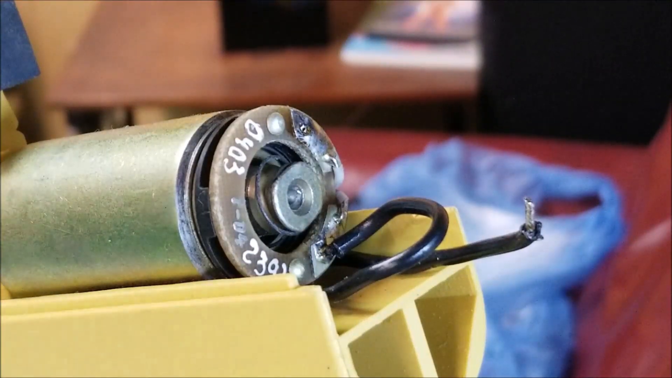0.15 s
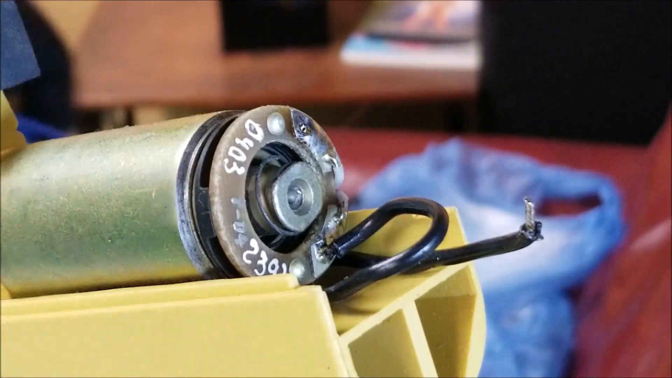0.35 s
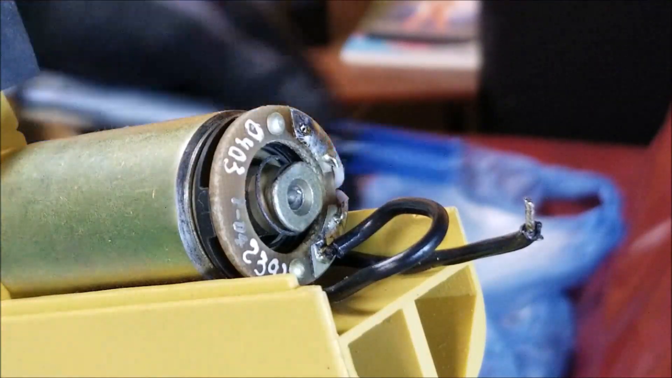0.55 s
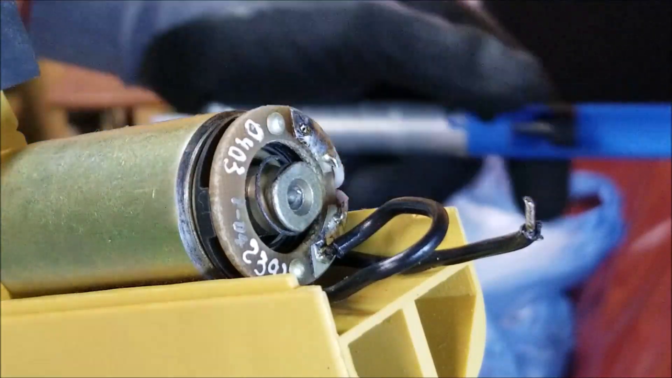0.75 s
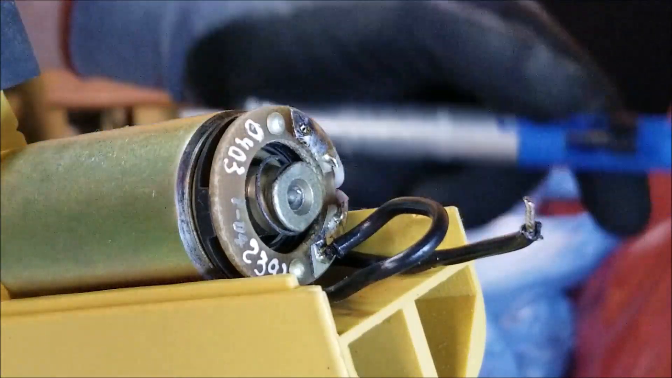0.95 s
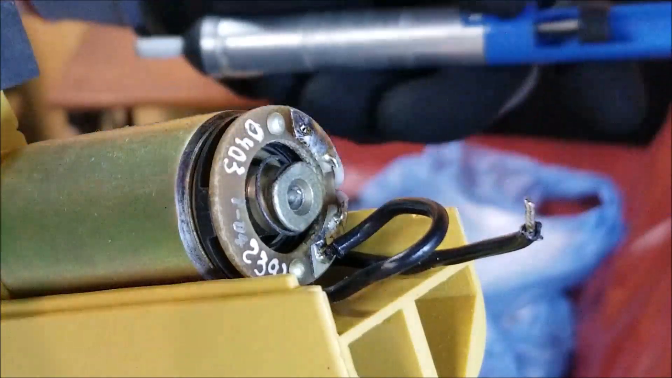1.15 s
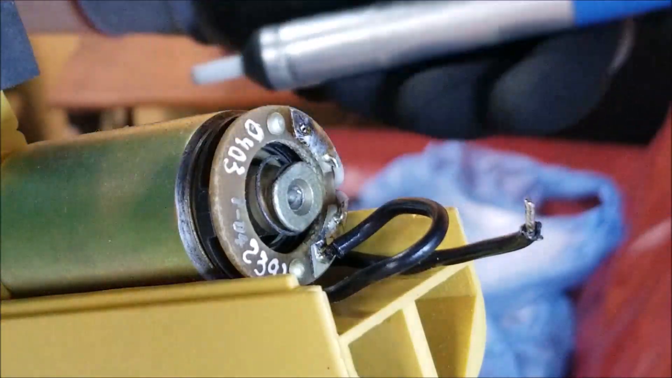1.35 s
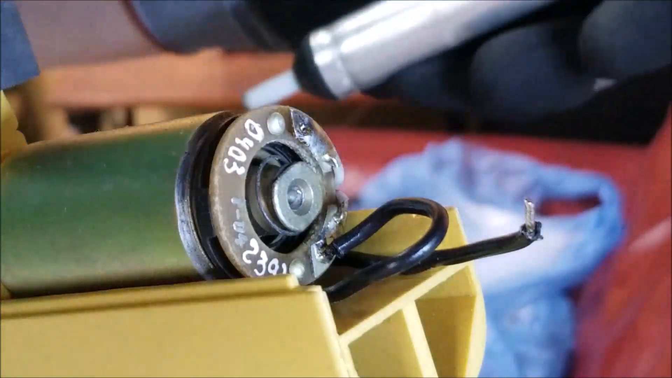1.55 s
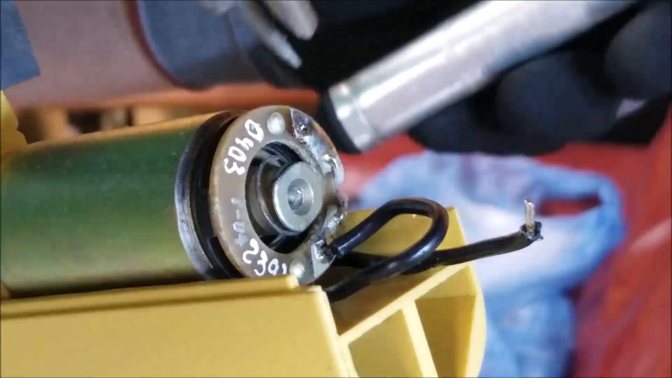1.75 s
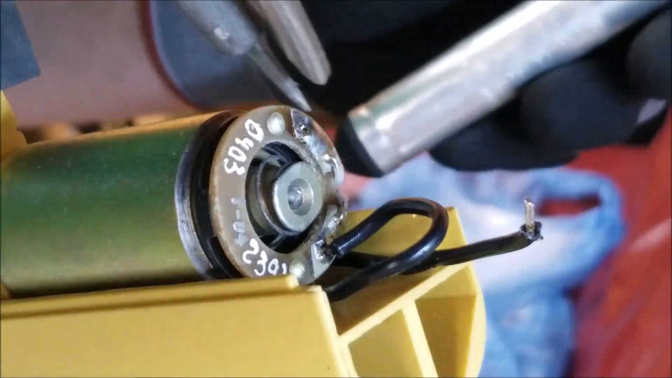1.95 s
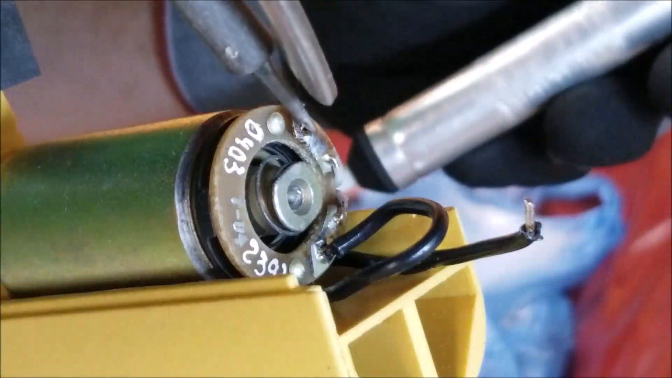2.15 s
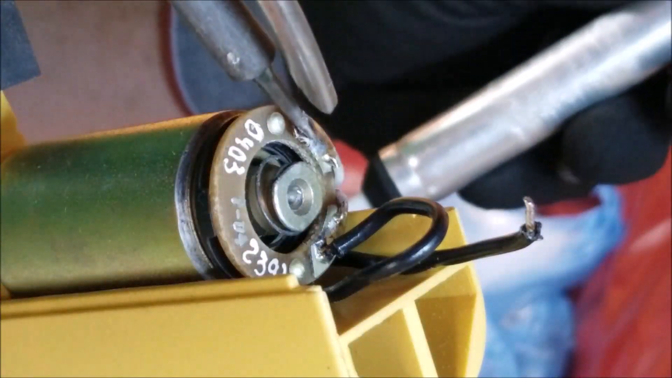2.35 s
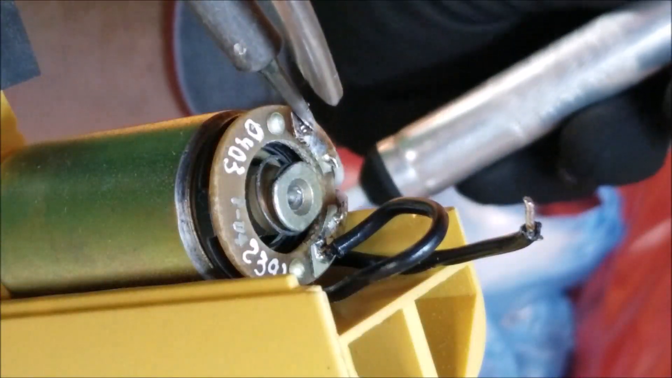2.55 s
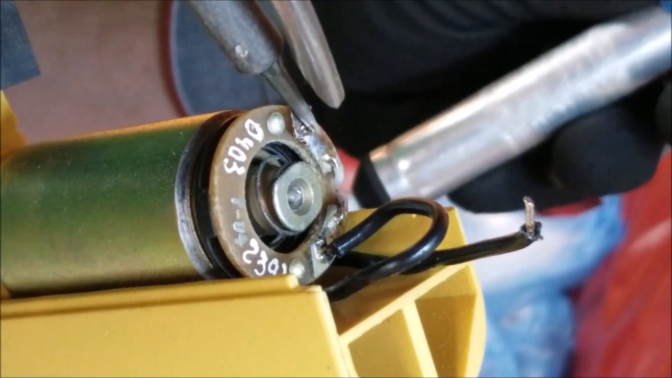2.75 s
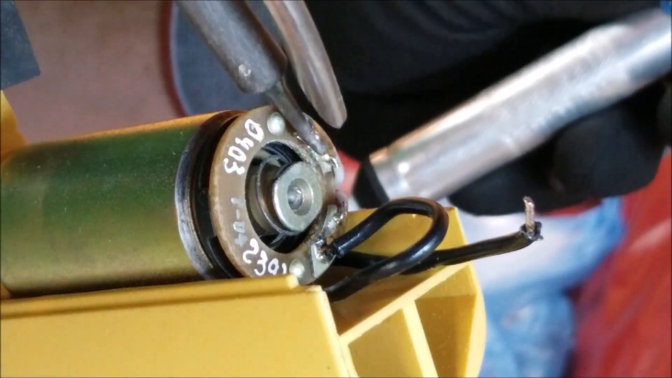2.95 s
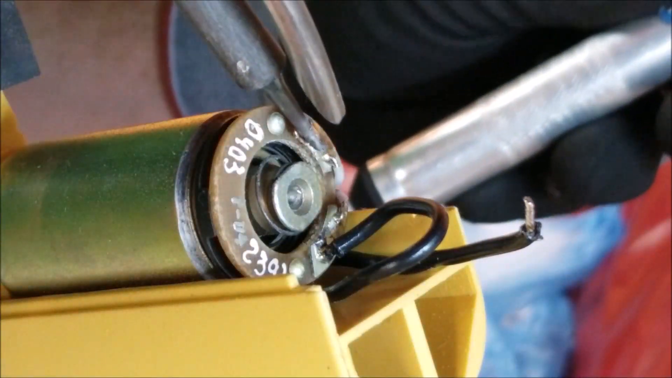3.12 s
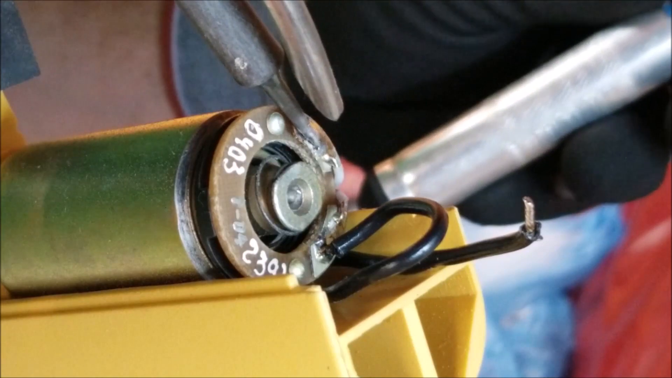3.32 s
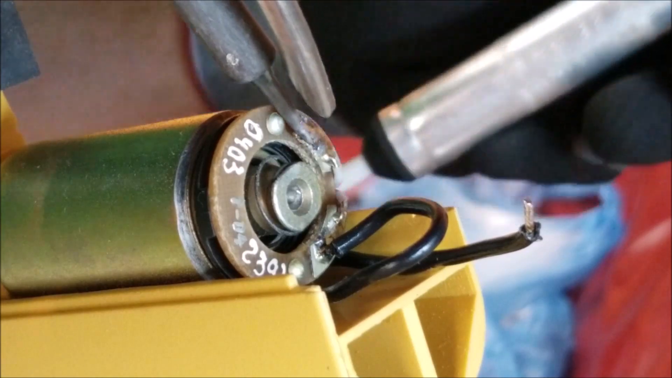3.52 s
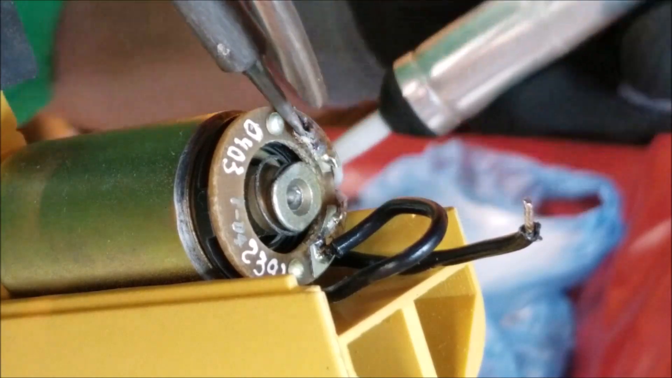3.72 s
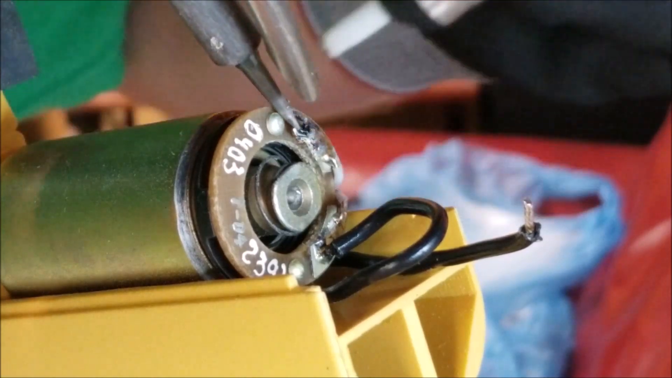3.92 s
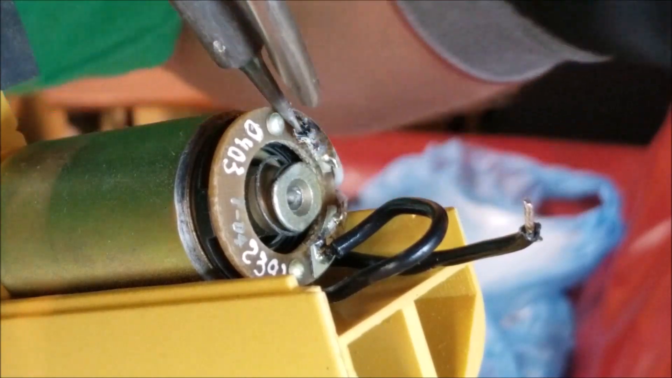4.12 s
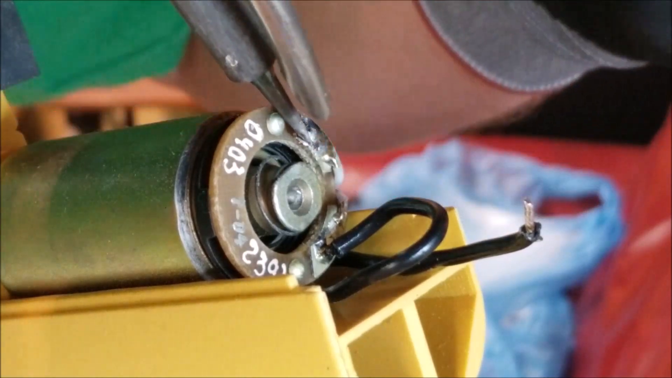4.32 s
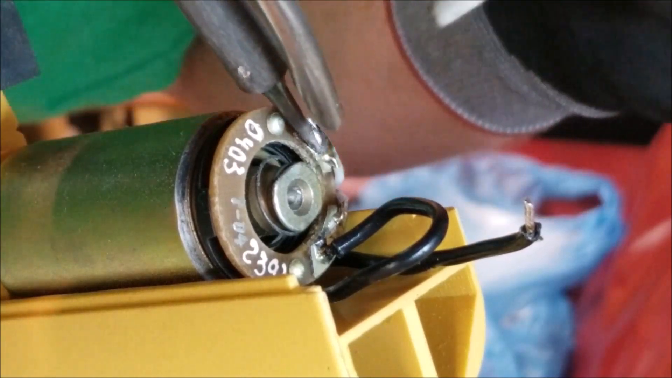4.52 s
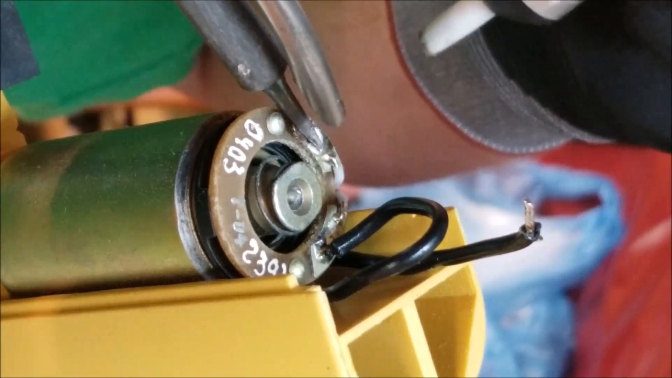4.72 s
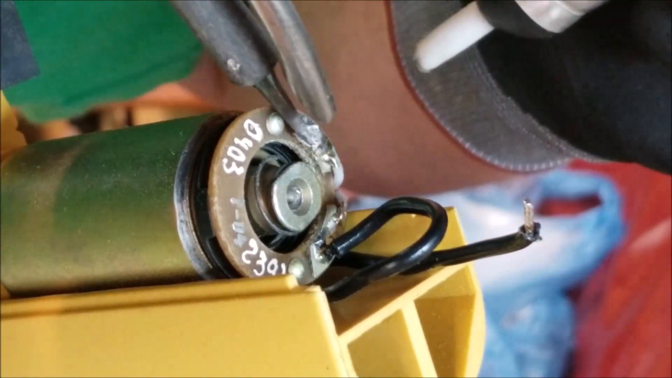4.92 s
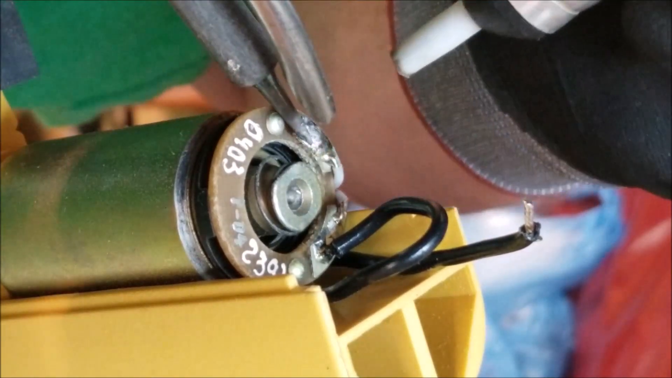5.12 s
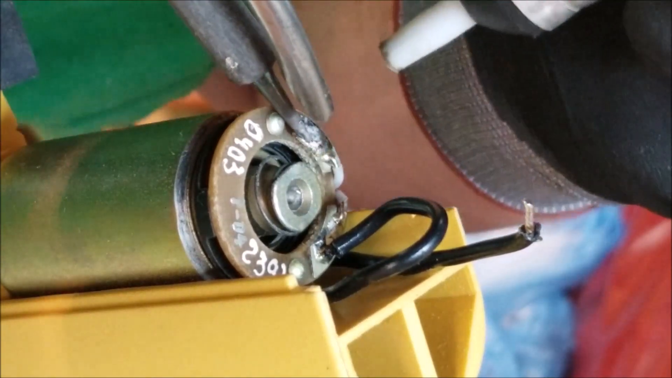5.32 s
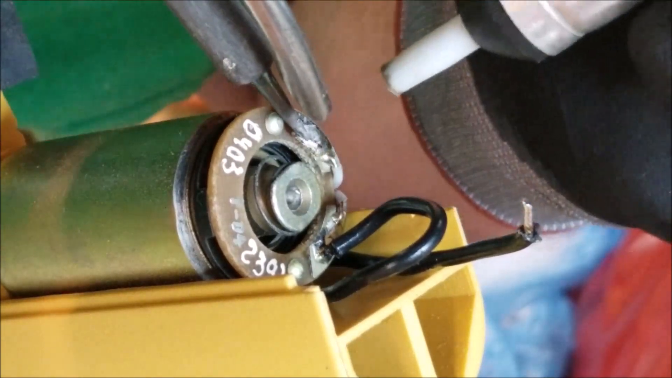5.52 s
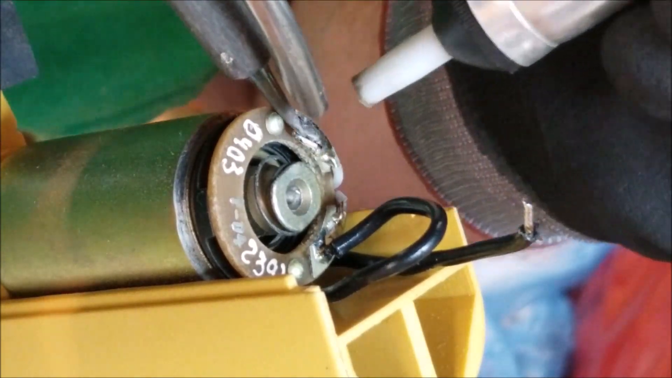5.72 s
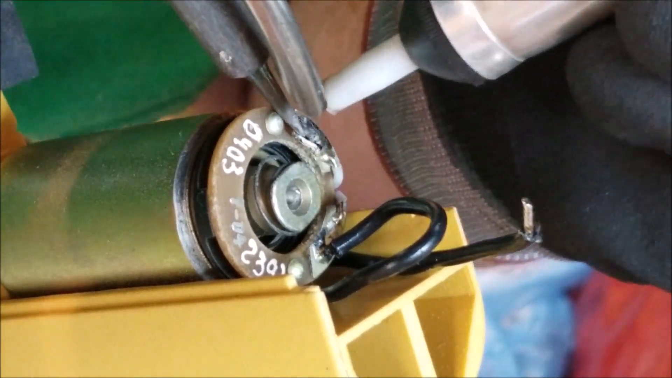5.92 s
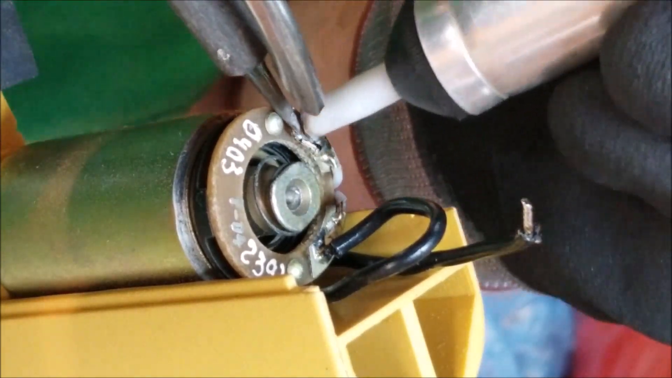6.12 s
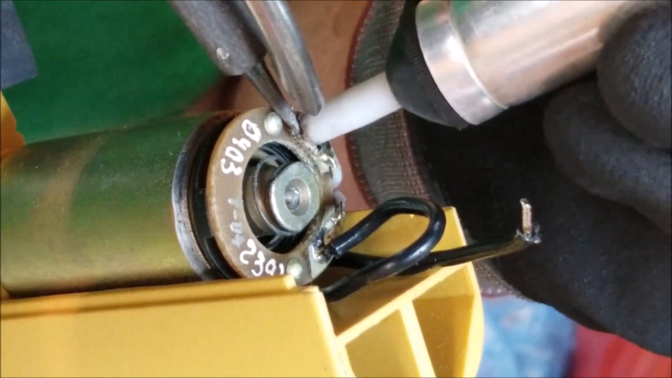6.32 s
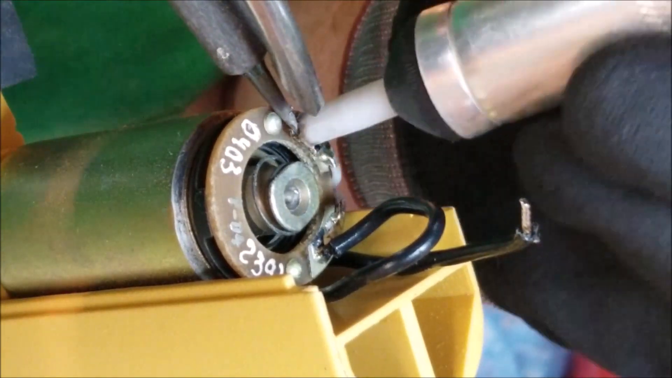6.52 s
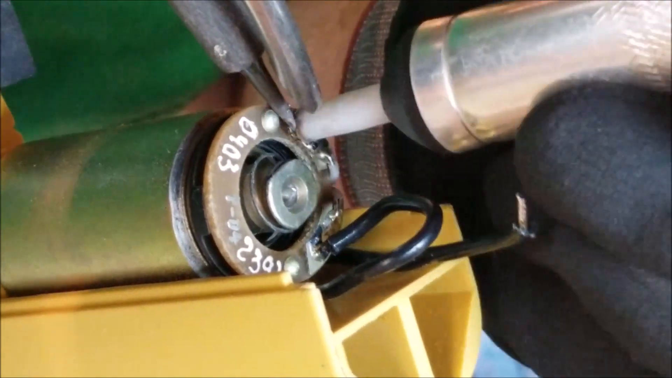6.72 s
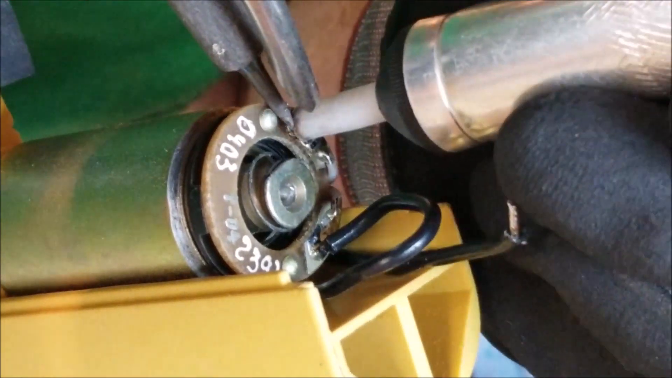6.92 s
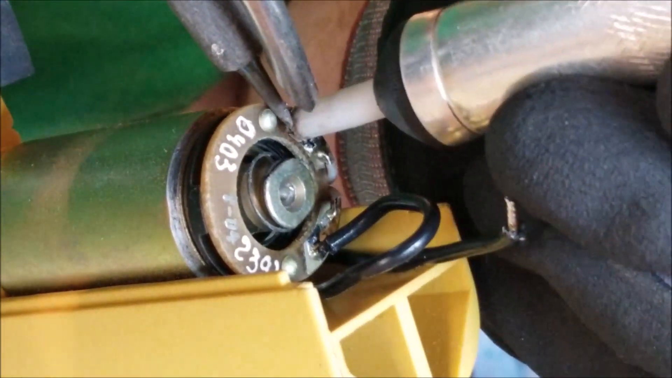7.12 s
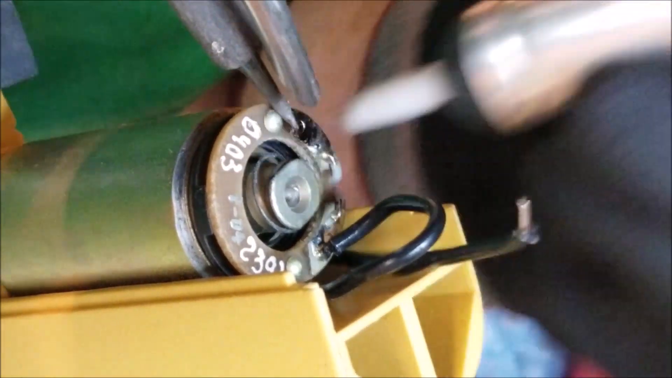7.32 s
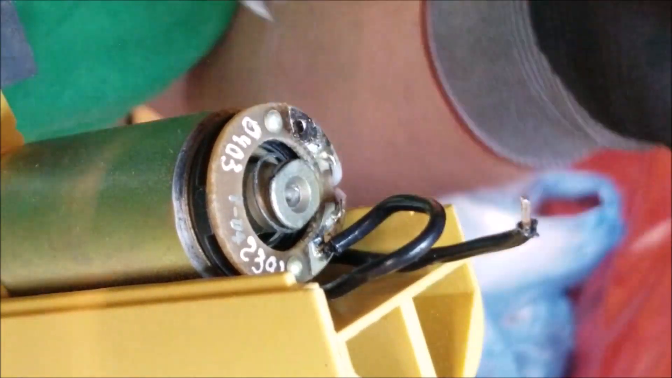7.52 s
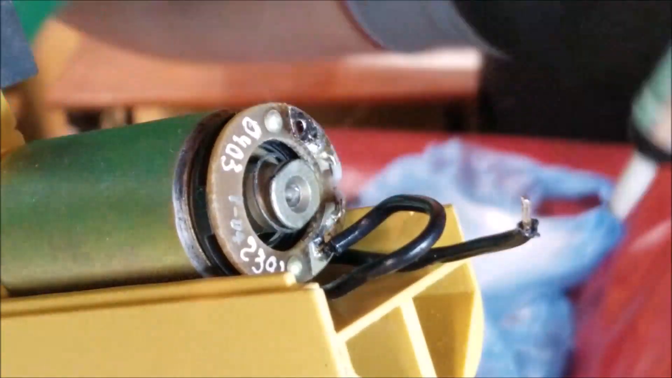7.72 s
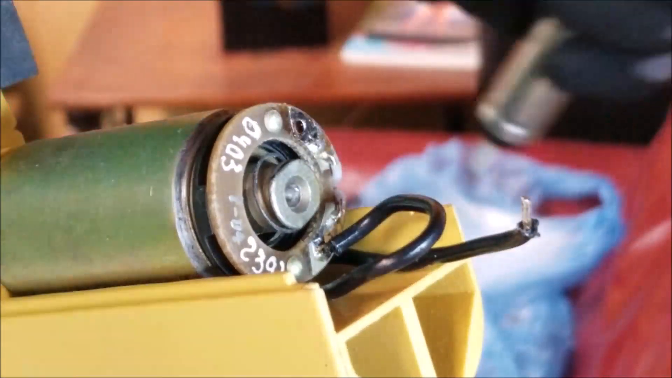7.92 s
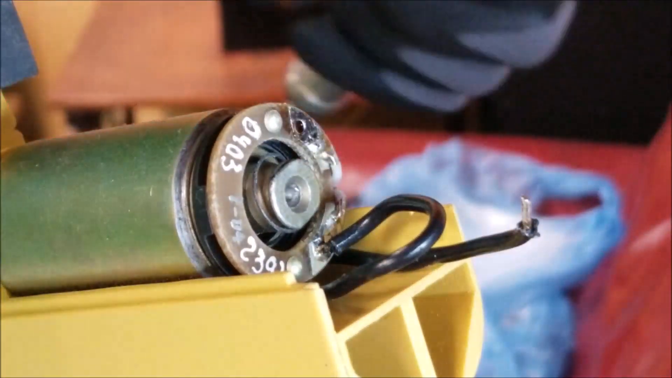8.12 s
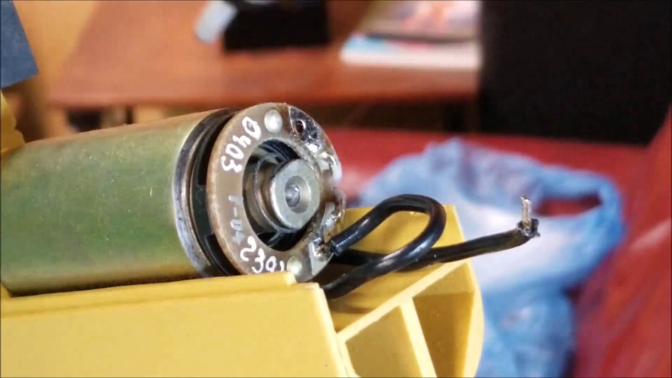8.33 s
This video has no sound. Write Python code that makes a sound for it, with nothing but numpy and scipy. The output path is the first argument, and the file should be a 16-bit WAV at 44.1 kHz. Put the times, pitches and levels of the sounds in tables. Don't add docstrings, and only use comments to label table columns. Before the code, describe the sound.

Steady mains hum and airy fan hiss in a small workshop, then one sharp rattling clack from a spring-loaded solder sucker with a brief air puff.

```python
import sys
import numpy as np
from scipy import signal
from scipy.fft import rfft, irfft
from scipy.io import wavfile
from scipy.ndimage import uniform_filter1d

SR = 44100
rng = np.random.default_rng(int(sys.argv[2]) if len(sys.argv) > 2 else 0)


def unload_audio(sound):
    columns = np.transpose(np.atleast_2d(sound))
    steps = np.round(np.clip(columns, -1, 1) * 32767)
    wavfile.write(sys.argv[1], SR, steps.astype(np.int16))


def boost(x):
    u = np.asarray(x, float) / 20
    return 10 ** u


N = 368764


def read(points, hz, column=1):
    table = np.transpose(points)
    return np.interp(np.log(hz + 1), np.log(table[0] + 1), table[column])


def read_pair(points, hz):
    return np.array([read(points, hz, column=c) for c in (1, 2)])


def curve(points, t):
    s, *columns = np.transpose(points)
    return np.array([np.interp(t, s, c) for c in columns])


def ramp(t, start, end):
    return np.clip((t - start) / (end - start), 0, 1)


def bump(x, centre, spread):
    return np.exp(-.5 * ((x - centre) / spread) ** 2)


def evened(x):
    return x / np.sqrt(np.mean(x ** 2) + 1e-20)


def add(mix, s, sound):
    part = mix[..., round(s * SR):][..., :sound.shape[-1]]
    part += sound[..., :part.shape[-1]]


def drift(rate_hz):
    coarse = evened(uniform_filter1d(rng.standard_normal(int(4 * rate_hz * N / SR) + 8), size=4))
    return np.interp(np.linspace(0, len(coarse) - 1, N), np.arange(len(coarse)), coarse)


def tone(hz, left_db, right_db, lead, waver_db):
    turn = 2 * np.pi * (hz * np.arange(N) / SR + rng.random())
    pair = np.array([boost(left_db) * np.sin(turn + lead), boost(right_db) * np.sin(turn)])
    return np.sqrt(2) * pair * boost(waver_db * drift(rate_hz=1.5))


def hands(t):
    # t/s, nearness/0-1
    path = [
        (0, 0),
        (.4, 0),
        (.75, 0.17),
        (1.05, 0.46),
        (1.4, 0.52),
        (1.7, 0.86),
        (2.1, 1),
        (7.5, 1),
        (7.95, 0.4),
        (8.36, 0.32),
    ]
    return np.clip(curve(path, t)[0], 0, 1)


def hum():
    # multiple of the mains, left level/dB, right level/dB, left lead/rad
    buzz = [(2, -56, -57, -0.2), (3, -59, -60, -0.1), (4, -68, -66, -0.5), (5, -69, -69, -0.3),
            (6, -83, -74, -0.9), (7, -71, -82, 1.9), (8, -74, -70, 0.4), (9, -63, -74, -2.7),
            (10, -61, -64, -0.3), (11, -71, -73, 0.0), (12, -74, -66, 0.8), (13, -78, -75, 0.4),
            (14, -67, -72, -2.3), (15, -71, -75, -1.3), (16, -82, -83, 0.3), (17, -76, -83, -0.4),
            (18, -72, -84, 0.7), (19, -70, -80, -2.4), (20, -72, -79, -1.2), (21, -79, -75, -1.2),
            (22, -68, -103, -2.1), (23, -78, -74, -2.0), (24, -69, -73, -0.9), (25, -72, -83, 2.8),
            (26, -78, -86, 2.9), (27, -72, -74, -1.8), (28, -70, -81, -2.2), (29, -83, -76, -2.9),
            (30, -72, -76, -0.8), (31, -81, -84, -2.9)]
    # multiple, left level/dB, right level/dB
    upper = [(32, -75, -81), (33, -81, -79), (34, -77, -83), (35, -78, -84), (37, -78, -87), (38, -76, -84),
             (39, -74, -84), (41, -80, -90), (42, -82, -90), (43, -76, -83), (44, -73, -85), (45, -82, -90),
             (46, -81, -90), (47, -82, -85), (48, -80, -91), (49, -85, -76), (50, -86, -88), (51, -87, -83),
             (53, -87, -90), (54, -84, -87), (55, -88, -90), (56, -86, -89)]
    opposed = (33, 34, 37, 38, 39, 42, 43, 48, 49)
    # f/Hz, left level/dB, right level/dB, left lead/rad
    fan = [(58.94, -53, -56, -0.1), (74.5, -74, -75, 0.2), (91.74, -73, -77, -0.1), (117.84, -73, -76, 0.2),
           (131.3, -59, -61, -0.1), (150.7, -73, -74, 0.0), (471.52, -60, -69, 0.1)]
    mains_hz = 60.002
    trigger_s, trigger_rise_s = 0.33, .2
    gun_off_db, gun_away_db = -1, -3
    surge_db, surge_period_s, surge_top_s = 1, 2.73, 3.52
    t = np.arange(N) / SR
    away = 1 - hands(t)
    off = 1 - ramp(t, trigger_s, trigger_s + trigger_rise_s)
    lines = {}
    for k, left_db, right_db, lead in buzz:
        lines[k] = tone(k * mains_hz, left_db, right_db, lead, waver_db=.7)
    for k, left_db, right_db in upper:
        lines[k] = tone(k * mains_hz, left_db, right_db, np.pi * (k in opposed), waver_db=1.0)
    lines[3] *= boost(5 * off)
    lines[12] *= boost(1.5 + 4.5 * away - 0.23 * t)
    gun = sum(line for k, line in lines.items() if k > 4)
    gun = gun * boost(gun_off_db * off + gun_away_db * away)
    shaft, *others = (tone(*row, waver_db=1.04) for row in fan)
    surge = surge_db * np.cos(2 * np.pi * (t - surge_top_s) / surge_period_s)
    return lines[2] + lines[3] + lines[4] + gun + shaft * boost(surge) + sum(others)


def cupped(hz, echoes, hollows, nearness, stretch):
    echo = sum(share * np.exp(-2j * np.pi * hz / stretch * ms / 1000) for ms, share in echoes)
    hollow_db = sum(db * bump(hz / stretch, f, spread) for f, spread, db in hollows)
    travel = 1.1 * nearness * (1 - nearness)
    return (1 + nearness * echo) * boost((.5 + .5 * nearness + travel) * hollow_db)


def hiss():
    # f/Hz, left level/dB per Hz, right level/dB per Hz
    hiss_colour = [(3000, -100.5, -95), (3480, -101.5, -99), (4730, -98, -99), (6040, -97.5, -99),
                   (5830, -102, -102.5), (7100, -101, -102), (7530, -104, -106), (8000, -105, -107),
                   (10040, -101, -104), (10400, -96, -100), (12600, -95.5, -99), (13000, -99, -99),
                   (14000, -102, -103), (15900, -105, -107)]
    # delay/ms, share
    left_echoes = [(1.96, -.3), (.53, .14), (1.27, .12), (2.9, .1)]
    # delay/ms, share
    right_echoes = [(1.105, .25), (1.6, .18), (.485, .12), (3.2, .12)]
    # f/Hz, width/Hz, level/dB
    left_hollows = [(4690, 150, 2), (6370, 180, 4), (7550, 120, -5), (8400, 200, -4), (9100, 100, -3),
                    (10030, 180, 3), (11970, 150, 3), (13390, 150, 2), (14470, 150, 3)]
    # f/Hz, width/Hz, level/dB
    right_hollows = [(6290, 180, 4), (7500, 150, -5), (8400, 130, -5), (9950, 130, 2), (12400, 180, 4),
                     (13500, 120, -3), (14430, 200, 3)]
    sway = [(0, 1.02), (.2, 1.0), (.4, .97), (.6, 1.04), (1, 1.0)]
    open_stretch, settled_at = 0.89, 0.69
    lag_near_ms, lag_away_ms = .103, .43
    pan_near_db, pan_away_db = -2, 15
    hz, t, (near, a, b) = signal.stft(rng.standard_normal((3, N)), SR, nperseg=1024, noverlap=768)
    hz = hz[:, None]
    nearness = hands(t)
    away = 1 - nearness

    tremor = .006 * drift(rate_hz=.8)[np.minimum(t * SR, N - 1).astype(int)]
    left_stretch = curve(sway, nearness)[0] + tremor
    right_stretch = open_stretch + (1 - open_stretch) * ramp(nearness, .1, settled_at) + tremor
    lag_ms = lag_near_ms + (lag_away_ms - lag_near_ms) * away ** 2
    direct = np.interp(hz, [3000, 5800, 9000, 14500, 15500], [.4, .55, .75, .75, .45])
    left = (direct * near + 0.85 * a) * cupped(hz, left_echoes, left_hollows, nearness, left_stretch)
    late = near * np.exp(-2j * np.pi * hz * lag_ms / 1000)
    right = (direct * late + 0.63 * b) * cupped(hz, right_echoes, right_hollows, nearness, right_stretch)

    treble_db = -1.5 + 3.5 * (1 - ramp(nearness, .3, 1))
    pan_db = pan_near_db + (pan_away_db - pan_near_db) * away ** 2
    shadow = np.interp(hz, [4500, 6000, 8000], [0, .3, 1])
    shade_db = shadow * np.array([treble_db + 0.091 * pan_db, treble_db - 0.74 * pan_db])[:, None]
    passing_db = 9 * nearness * away * bump(hz, 5400, 800)
    right_only_db = np.array([0., 7.])[:, None, None]
    passing_db = passing_db - right_only_db * away * bump(hz, 8000, 900)
    colour_db = read_pair(hiss_colour, hz) - np.interp(hz, [2000, 2700, 3500], [50, 8, 0])

    patches = uniform_filter1d(rng.standard_normal(near.shape), 6, 0)
    patches = evened(uniform_filter1d(patches, 40, 1))
    glints = uniform_filter1d(rng.standard_normal((2,) + near.shape), size=22, axis=1)
    glints = uniform_filter1d(glints, size=26, axis=2)
    glints = evened(uniform_filter1d(glints, size=9, axis=1))
    glints_db = 2.0 * np.minimum(3 * away, 1) * shadow * glints
    total_db = colour_db + shade_db + passing_db + glints_db + 0.29 * patches
    pair = np.array([left, right]) * boost(total_db) * np.sqrt(SR / 2)
    return signal.istft(pair, SR, nperseg=1024, noverlap=768)[1][:, :N]


def ring(hz, t60, t):
    return -np.sin(2 * np.pi * hz * t) * boost(-60 * t / t60)


def sucker():
    # f/Hz, left level/dB, right level/dB
    rattle_colour = [(300, -64, -65), (800, -63, -64), (1500, -56, -65), (2300, -58, -64), (3200, -62, -63),
                     (4200, -66, -64), (5200, -65, -64), (6200, -64, -66), (7300, -67, -68),
                     (8600, -67, -69), (10200, -65, -69), (12000, -62, -66), (13800, -67, -68),
                     (15600, -71, -73)]
    # f/Hz, width/Hz, level/dB
    barrel = [(800, 150, -6), (4100, 400, -3), (5100, 300, -2), (8700, 700, -3), (12400, 900, 3)]
    # t/s, left level/dB, right level/dB, tube ring f/Hz, ring level/dB
    strikes = [
        (7.0502, -39, -32, 2350, -31),
        (7.0545, -38, -31, 2250, -32),
        (7.0582, -18, -22, 2400, -27),
        (7.0612, -22, -23, 3200, -25),
        (7.0645, -24, -24, 2100, -27),
        (7.0675, -21, -19, 1600, -16),
        (7.0698, -26, -23, 1350, -30),
        (7.0722, -28, -27, 1800, -33),
        (7.0758, -35, -31, 1800, -37),
    ]
    # t/s, left level/dB, right level/dB, ring f/Hz, t60/s
    ticks = [
        (7.0575, -31, -31, 1050, .008),
        (7.0676, -22, -14, 1550, .0025),
        (7.0679, -26, -26, 1150, .009),
        (7.3434, -48, -46, 12500, .012),
        (7.3449, -43, -40, 7600, .005),
        (7.345, -43, -40, 10500, .004),
        (7.3452, -47, -44, 13300, .006),
        (7.345, -44, -41, 5900, .006),
        (7.3455, -45, -42, 5300, .006),
    ]
    long_t60, end_t60, run_s = 0.053, 0.013, 0.024
    t = np.arange(2048) / SR
    rattles, rings = np.zeros((2, 2, N))
    hz = np.fft.rfftfreq(len(t), 1 / SR)
    tilt_db = np.interp(hz, [300, 900, 2000, 3000, 9000, 12000, 14500], [28, 7, 3, 0, -1, -0.5, 0])
    barrel_db = sum(db * bump(hz, f, spread) for f, spread, db in barrel)
    colour = boost(read_pair(rattle_colour, hz) - tilt_db + barrel_db)
    for s, left_db, right_db, ring_hz, ring_db in strikes:
        t60 = long_t60 + (end_t60 - long_t60) * ramp(s - strikes[0][0], 0, run_s)
        grit = rng.standard_normal((3, len(t)))
        shared_grit = grit[:2] + 0.4 * grit[2]
        rattle = evened(irfft(rfft(shared_grit, axis=1) * colour, axis=1))
        fall = boost(np.array([[left_db], [right_db]]) - 60 * t / t60)
        add(rattles, s, rattle * fall * (1 - np.exp(-t / 0.000069)))
        tube = np.sqrt(2) * ring(ring_hz, 0.48 * t60, t) * boost(ring_db)
        add(rings, s, tube * np.array([[1], [.15]]))
    for s, left_db, right_db, ring_hz, t60 in ticks:
        add(rings, s, np.sqrt(2) * ring(ring_hz, t60, t) * boost(np.array([[left_db], [right_db]])))
    return rattles, rings


def puff():
    # f/Hz, level/dB
    nozzle = [(700, -20), (1600, 0), (2500, 0), (3500, -12), (5500, -5), (8000, -14), (12500, -12),
              (15500, -16)]
    start_s, level_db, t60 = 7.074, -45, 0.33
    t = np.arange(SR // 2) / SR
    colour = boost(read(nozzle, np.fft.rfftfreq(len(t), 1 / SR)))
    rush = evened(irfft(rfft(rng.standard_normal((2, len(t))), axis=1) * colour, axis=1))
    lumps = evened(uniform_filter1d(rng.standard_normal(len(t)), size=400))
    out = np.zeros((2, N))
    add(out, start_s, rush * boost(level_db + 2.1 * lumps - 60 * t / t60) * ramp(t, 0, .004))
    return out


def bench():
    # t/s, peak level/dB, start f/Hz, end f/Hz, t60/s
    thumps = [
        (4.912, -37, 175, 60, .07),
        (6.2822, -28.5, 290, 45, .075),
        (7.0518, -34, 260, 110, .025),
        (7.0572, -23, 230, 145, .028),
        (7.0668, -29, 500, 440, .022),
        (7.0714, -25, 120, 78, .045),
    ]
    t = np.arange(6000) / SR
    out = np.zeros(N)
    for s, peak_db, start_hz, end_hz, t60 in thumps:
        turns = np.cumsum(end_hz + (start_hz - end_hz) * np.exp(-t / .003)) / SR
        swing = -np.sin(2 * np.pi * turns) * boost(peak_db - 60 * t / t60)
        add(out, s, swing * (1 - np.exp(-t / .001)))
    return signal.sosfilt(signal.butter(2, 40, "high", fs=SR, output="sos"), out)


def air():
    # f/Hz, left level/dB per Hz, right level/dB per Hz
    rush_colour = [(25, -94, -88), (40, -95, -100), (60, -89, -88), (100, -92, -85), (131, -86, -82.5),
                   (203, -95.5, -87.5), (340, -86.5, -91.5), (403, -91.5, -96.5), (576, -89.5, -90),
                   (960, -94.5, -96), (1550, -91.5, -95.5), (2250, -95, -100), (3180, -95, -99),
                   (3700, -99, -100)]
    # f/Hz, likeness
    likeness = [(60, 0.99), (200, 0.78), (400, 0.55), (900, 0.26), (1500, 0.034), (3700, 0.14)]
    ripple_db, ripple_hz = 1.6, 18
    sleeve_s, sleeve_width_s, sleeve_db = 0.924, 0.047, 2.5
    hz = np.fft.rfftfreq(N, 1 / SR)
    left, other = rfft(rng.standard_normal((2, N)), axis=1)
    same = np.clip(read(likeness, hz), -1, 1)
    pair = np.array([left, same * left + np.sqrt(1 - same ** 2) * other])
    edge_db = 1.2 - np.interp(hz, [2700, 3500, 5000], [0, 8, 60]) - np.interp(hz, [8, 25], [30, 0])
    colour_db = read_pair(rush_colour, hz) + edge_db
    colour_db += np.array([[5.5], [3.]]) * bump(hz, 1895, 35)
    bins = round(ripple_hz * N / SR)
    ripple = uniform_filter1d(rng.standard_normal(len(hz)), size=bins)
    ripple = evened(uniform_filter1d(ripple, size=bins))
    colour_db += ripple_db * ripple * ramp(hz, 700, 1400)
    thrown_db = sleeve_db * bump(np.arange(N) / SR, sleeve_s, sleeve_width_s)
    rush = irfft(pair * boost(colour_db) * np.sqrt(SR / 2), N, axis=1)
    return rush * boost(.5 * drift(rate_hz=2.5) + thrown_db)


def room(x):
    # f/Hz, t60/s
    decay = [(150, 0.74), (1500, 0.51), (5000, 0.45), (12000, 0.25)]
    taps = np.zeros((2, SR // 2))
    at = np.arange(300, SR // 2 - 20, 10)
    at = at + rng.integers(0, 10, (2, len(at)))
    np.put_along_axis(taps, at, rng.choice([-1., 1.], at.shape), 1)
    hz, t, z = signal.stft(taps, SR, nperseg=256)
    tail = signal.istft(z * boost(-60 * t / read(decay, hz)[:, None]), SR, nperseg=256)[1]
    return signal.fftconvolve(x, tail / np.linalg.norm(tail[0]), axes=1)[:, :N]


def recorder_db(t):
    start_db, rise_from_s, rise_to_s = -4, 0.4, 0.74
    duck_db, duck_s, fall_s, back_s = -1.3, 7.34, 0.28, 0.46
    lowest_s = duck_s + fall_s
    dip = ramp(t, duck_s, lowest_s) - ramp(t, lowest_s, lowest_s + back_s)
    return start_db * (1 - ramp(t, rise_from_s, rise_to_s)) + duck_db * dip


def scene():
    rattles, rings = sucker()
    steady = (hum() + hiss() + air()) * boost(recorder_db(np.arange(N) / SR))
    echo = boost(-14) * room(rattles + boost(-3) * rings)
    return steady + rattles + rings + echo + puff() + bench()


def low_pass(x):
    return signal.sosfilt(signal.butter(12, 16470, fs=SR, output="sos"), x)


def record(dry):
    edge = signal.firwin(1023, 15720, window=("kaiser", 9), fs=SR)
    return low_pass(signal.oaconvolve(dry, edge[None], "same"))


dry = scene()
out = record(dry)
unload_audio(out)
```